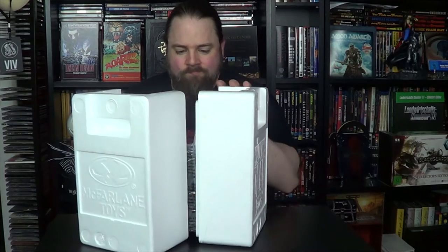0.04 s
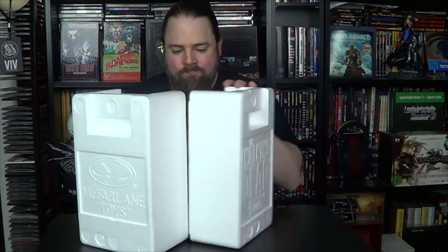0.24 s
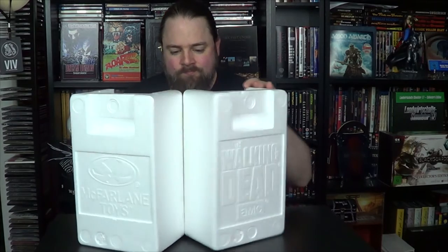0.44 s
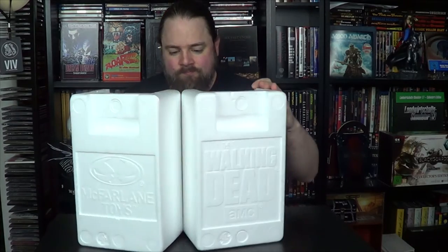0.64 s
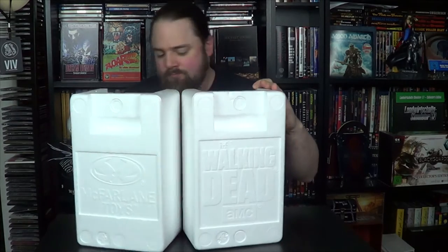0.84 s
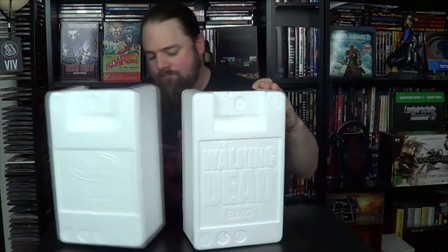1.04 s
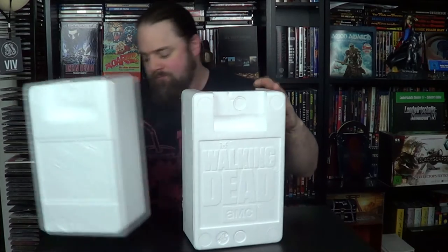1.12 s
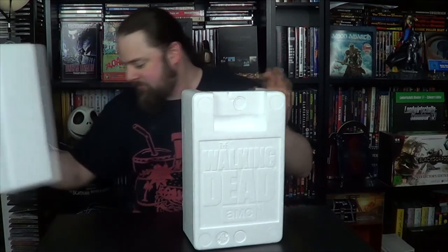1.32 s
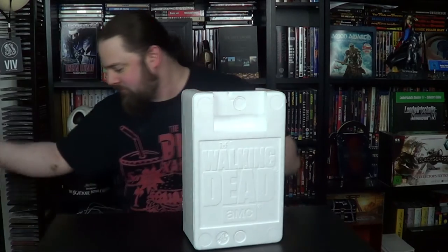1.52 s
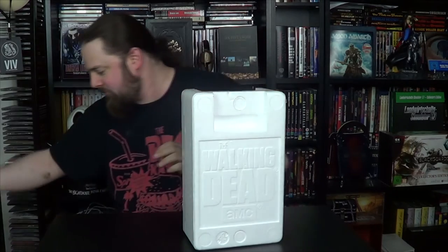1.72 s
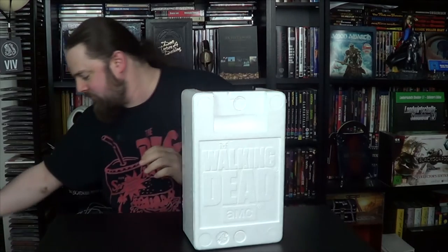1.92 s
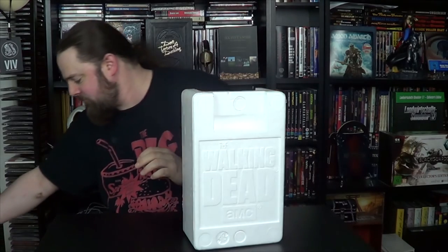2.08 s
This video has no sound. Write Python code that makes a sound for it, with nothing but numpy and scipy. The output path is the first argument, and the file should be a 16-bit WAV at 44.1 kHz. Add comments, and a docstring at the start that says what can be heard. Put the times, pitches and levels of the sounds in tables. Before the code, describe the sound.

Dry foam packing scrapes and squeaks as it is pulled apart, followed by soft hollow knocks

```python
"""Two halves of a foam case rub as they are swung open and pulled apart on a table in a small, shelf-lined room.
Random clicks make the rising hiss and rasp; a rough pulse train makes one short squeak; struck modes make snaps.
Then one hollow half is lifted, bumped and set aside: short bursts of clicks ring its shell, with dull table
thumps and soft brushing. Filtered noise makes the quiet room and a thin hiss; a sine makes a faint high whine."""
import sys
import numpy as np
from scipy import signal
from scipy.fft import rfft, irfft
from scipy.io import wavfile

SR = 44100
rng = np.random.default_rng(int(sys.argv[2]) if len(sys.argv) > 2 else 0)


def unload_wav(signal):
    """Save mono or channel-first audio to the path in sys.argv[1] as 16-bit WAV at rate SR, clipped to [-1, 1]."""
    wavfile.write(
        sys.argv[1],
        SR,
        np.round(np.clip(np.atleast_2d(signal).T, -1, 1) * 32767).astype(np.int16),
    )


N = 94815
T = np.arange(N) / SR  # time in seconds

# The faces rubbing: t/s, bead hiss level/dB, shell rasp level/dB
RUBBING = [(0, -63, -58), (.01, -55, -54), (.04, -47, -46.5), (.066, -42.5, -48), (.09, -60, -50),
           (.112, -62, -52.5), (0.128, -42.5, -44), (.21, -40, -41), (.27, -34.5, -40.5),
           (.355, -30.5, -40), (.41, -31, -40), (.48, -27, -37.5), (.525, -42, -40.5), (.562, -46, -41),
           (.59, -34.5, -42), (0.639, -35, -41.5), (.714, -52.5, -49.5), (.76, -43, -45.5),
           (.8, -62, -50.5), (.84, -59, -54), (.87, -66, -58.5), (.93, -56, -53), (.97, -85, -68),
           (1.08, -89, -63)]
# Spectrum of the bead hiss: f/Hz, relative level per Hz/dB
HISS_COLOUR = [(2000, -47), (4400, -17.5), (5200, -4.5), (6300, -3), (7300, -5), (8000, -1), (9700, 3),
               (11500, -3.5), (12600, -9.5), (16000, -13.5)]
# Spectrum of the shell's rasp: f/Hz, relative level per Hz/dB
RASP_COLOUR = [(50, -48), (100, -26), (165, -24), (190, -8.5), (225, -14), (270, -2), (295, -10.5),
               (340, -5), (430, -1), (550, -2), (680, -5), (1000, 1.5), (1400, -3), (2250, 2), (2900, -3.5),
               (3700, 1), (4600, -9.5), (9000, -49)]
SLIPS_PER_S, SLIP_SPREAD_DB = 18000, 2
JUDDER_DB, JUDDER_HZ = 0.5, 90  # unsteadiness of the slip sizes, and its highest rate

# Stick-slip squeak: t/s, slip rate f/Hz, level/dB
SQUEAK = [(.484, 1340, -61), (0.4856, 1330, -29), (0.488, 1364, -20.5), (.493, 1310, -21),
          (0.495, 1333, -15), (0.506, 1273, -18), (0.51, 1270, -24), (0.519, 1284, -28), (.53, 1265, -44),
          (.56, 1304, -60)]
# Spectrum of the squeak: f/Hz, relative level per Hz/dB
SQUEAK_COLOUR = [(1000, -44), (1700, -21), (2550, -13.5), (4200, -24.5), (5200, -13.5), (6500, -9),
                 (7600, -9.5), (8900, -1), (10300, -5.5), (11800, -5), (13000, -9), (16000, -20)]
SQUEAK_JITTER, JITTER_HZ = 0.018, 680  # spread of the slip rate as a share, and its highest rate
SQUEAK_GRIT = 1  # noise against pulses
SCATTER_S = 0.011  # phase delay of the fundamental, less for higher harmonics
# The shell singing under the squeak: f/Hz, level/dB, time to fall 60 dB/s
SING_MODES = [(2420, 0.5, 0.032), (2531, 0.5, 0.12), (5260, -3, .03), (6360, -6, 0.039)]
SING_DB = -16.5

# Beads snapping free: t/s, level/dB before the low cut
SNAPS = [(.0125, -51), (.0212, -47), (.4498, -28), (.772, -49), (.7877, -27)]
# What a snap rings with: f/Hz, level/dB, time to fall 60 dB/s
SNAP_MODES = [(1840, -14, 0.0023), (6200, -13, 0.01), (8360, -2.5, 0.0043), (9900, -2.5, 0.0018),
              (11200, -4.5, 0.0013), (15100, -9.5, 0.0017)]
SNAP_LOW_HZ = 3000  # a single bead radiates little below this

# Knocks and scuffs on the hollow foam: t/s, rise/s, fall/s, hollow ring level/dB, touched wall f/Hz,
# wall level/dB, crunch level/dB, bright crackle level/dB (all but the crackle before the low cut)
KNOCKS = [(.007, 0.0005, 0.014, -65, 1540, -46, -45, -74),
          (0.0204, 0.00053, 0.0069, -51, 1530, -40.5, -41, -49.5),
          (.115, 0.0035, 0.0066, -65, 303, -59, -65, -68), (.274, .004, 0.025, -38, 249, -51, -38, -54),
          (.319, 0.0041, 0.013, -37, 588, -38.5, -42, -60),
          (.358, 0.0019, 0.013, -57, 915, -55, -35.5, -39),
          (.549, 0.0024, 0.0058, -54, 546, -47, -44.5, -66),
          (0.748, 0.00409, 0.0069, -45.5, 229, -52, -44, -46),
          (0.857, .005, 0.022, -44, 407, -45.5, -46, -44.5),
          (0.988, 0.0011, 0.0047, -64, 438, -59, -62.5, -68.5),
          (1.1041, 0.00079, 0.0049, -44.5, 416, -42.5, -43, -47.5),
          (1.1184, 0.00026, 0.0024, -50, 417, -41.5, -37.5, -37.5),
          (1.127, 0.0017, 0.015, -48, 190, -53.5, -39.5, -47.5),
          (1.156, 0.00097, 0.011, -45, 560, -48, -54, -63), (1.176, 0.00096, .005, -54, 514, -50, -56, -53),
          (1.197, 0.0017, 0.0066, -68, 493, -47, -61, -70),
          (1.214, 0.00194, 0.0034, -59, 495, -47, -69, -77),
          (1.2595, 0.00065, 0.0047, -45.5, 1645, -47.5, -58, -54),
          (1.277, 0.00067, 0.0061, -65, 1120, -48.5, -59, -62),
          (1.487, .005, 0.023, -59, 940, -77, -56, -55.5),
          (1.542, 0.0032, 0.01, -48.5, 944, -44.5, -43, -42),
          (1.563, 0.00223, 0.0035, -47.5, 590, -53, -53, -56),
          (1.628, 0.0055, 0.014, -69, 483, -55.5, -77, -54.5),
          (1.738, 0.0021, 0.0049, -71, 503, -60.5, -66, -64),
          (2.012, 0.013, 0.011, -64, 1050, -63, -55, -61), (2.037, .002, 0.012, -50, 504, -47.5, -69, -61),
          (2.055, 0.0033, 0.0028, -51.5, 526, -63, -54, -61)]
# Hollow shell: f/Hz, level/dB, time to fall 60 dB/s
SHELL_MODES = [(330, -1, 0.099), (458, 3, 0.029), (517, 6.5, 0.058), (717, 3.5, 0.026), (903, 1.5, 0.073),
               (1080, -1.5, 0.065), (1406, -10, 0.12), (1620, -32.5, 0.02)]
# Spectrum of the crushed beads: f/Hz, relative level per Hz/dB
CRUNCH_COLOUR = [(50, -40), (150, -16), (400, -9), (900, 6), (1600, 7), (2400, 0.5), (3600, -0.5),
                 (4700, -15), (9000, -23)]
WALL_CYCLES = 28  # cycles the touched wall takes to fall 60 dB
CRUSH_SHARE = 0.7  # crushing against the impact
SHELL_LOW_HZ = 170  # the light shell radiates little below this

# Foam bumping the table: t/s, level/dB before softening
THUMPS = [(.057, -56.5), (.322, -52), (.84, -58), (1.119, -74)]
# The table: f/Hz, level/dB, time to fall 60 dB/s
TABLE_MODES = [(75.5, -5, 0.081), (110, -2, 0.036), (204, 1, 0.076)]
THUMP_SOFT_HZ = 259

# Light brushing as the half is set aside: middle t/s, half length/s, peak level/dB
BRUSHES = [(1.39, 0.088, -62.5), (1.639, 0.054, -54), (2.047, 0.02, -50)]
# Spectrum of the brushing: f/Hz, relative level per Hz/dB
BRUSH_COLOUR = [(150, -25), (500, 8), (2300, 5.5), (4600, -6), (6500, 0), (10500, -4.5), (14000, -13)]

# Position of the handled foam: t/s, left minus right level/dB
PAN = [(.5, 0), (1.15, .5), (1.5, 2.2), (2.05, 1.6)]
# Room decay: f/Hz, time to fall 60 dB/s
ROOM_T60 = [(200, 0.4), (550, 0.2), (1400, 0.22), (4000, 0.2), (10000, 0.36), (16000, 0.07)]
# Width of the reflections: f/Hz, side against middle level/dB
ROOM_SIDE = [(80, -16), (250, -19.5), (550, -17.5), (1200, -7), (2200, -12), (5000, -2), (7500, -4),
             (9500, -20), (15000, -64)]
# Width of the reflections of the squeak and snaps: f/Hz, side against middle level/dB
SHARP_SIDE = [(1000, -3), (5500, -6), (10000, -11.5), (15000, -16)]
# Reflections against direct sound, in dB
BODY_ROOM_DB, TREBLE_ROOM_DB, SQUEAK_ROOM_DB, SNAP_ROOM_DB = -5, -9, -8, -10.5
ROOM_GAP_S = 0.004023
EARLY_DB, EARLY_FALL_S = -1, 0.0071  # reflections off table and shelves: strength over the tail, and decay

# Faint thin hiss, drifting upward: t/s, centre f/Hz, level/dB
THIN_HISS = [(1.5, 10400, -85), (1.57, 10400, -59.5), (1.779, 10600, -72), (1.9, 11150, -67.5),
             (2.15, 11300, -69)]
THIN_HISS_WIDTH_HZ = 410  # to either side of the centre
# Room noise shared by both ears: f/Hz, relative level per Hz/dB
FLOOR_COLOUR = [(25, -16), (60, -11.5), (130, -7.5), (250, 1.5), (500, 1), (800, 1), (2500, 0),
                (4500, -3.5), (10800, -6), (13000, -9), (16000, -21)]
# Room noise differing between the ears: f/Hz, relative level per Hz/dB
FLOOR_SIDE_COLOUR = [(25, -24), (100, -21), (200, -13), (450, -2), (1000, -0.5), (2500, -6), (5000, -9.5),
                     (8000, -11), (10000, -26), (16000, -62)]
FLOOR_DB, FLOOR_SIDE_DB = -58.5, -60.5
WHINE_HZ, WHINE_DB = 15625, -69
CUTOFF_HZ = 15750


def rubbing():
    """The faces slide: the same slips hiss directly and rasp through the shell."""
    s, hiss_db, rasp_db = np.transpose(RUBBING)
    friction = slips()
    hiss = friction * from_db(np.interp(T, s, hiss_db, right=-120))
    rasp = friction * from_db(np.interp(T, s, rasp_db, right=-120))
    return colour(hiss, HISS_COLOUR), colour(rasp, RASP_COLOUR)


def slips():
    """Tiny slips of bead on bead: random clicks, scattered evenly, of uneven, slightly unsteady size; rms one."""
    size_db = SLIP_SPREAD_DB * np.minimum(rng.exponential(1, N), 5)
    sizes = from_db(size_db + JUDDER_DB * wander(JUDDER_HZ))
    signs = rng.choice([-1, 1], N)
    happens = rng.random(N) < SLIPS_PER_S / SR
    return unit(sizes * signs * happens) * np.sqrt(N)


def squeak():
    """The slips lock into a rough, slightly falling pulse train, smeared by the foam, that makes the shell sing."""
    s, hz, db = np.transpose(SQUEAK)
    rate = np.interp(T, s, hz) * (1 + SQUEAK_JITTER * wander(JITTER_HZ))
    phase = 2 * np.pi * np.cumsum(rate) / SR
    # bending waves: the higher a harmonic, the sooner it arrives
    scatter = 2 * np.pi * hz.mean() * SCATTER_S
    pulses = sum(np.cos(k * (phase - scatter / np.sqrt(k))) for k in range(1, 13))
    rough = pulses / pulses.std() + SQUEAK_GRIT * rng.standard_normal(N)
    level = from_db(np.interp(T, s, db, left=-120, right=-120))
    drive = rough / np.hypot(1, SQUEAK_GRIT) * level
    return colour(drive, SQUEAK_COLOUR) + from_db(SING_DB) * through(drive, ringing(SING_MODES))


def snaps():
    """Single caught beads let go with a thin, bright tick of short ringing modes."""
    low_cut = signal.butter(1, SNAP_LOW_HZ, "high", fs=SR, output="sos")
    return signal.sosfilt(low_cut, strikes(SNAPS, SNAP_MODES))


def knocks():
    """Each contact is an impact and a short crush of beads; returns the crackle and the shell's sound."""
    hollow, crunch, crackle = 0, 0, 0
    shell = ringing(SHELL_MODES)
    for s, rise, fall, ring_db, wall_hz, wall_db, crunch_db, crackle_db in KNOCKS:
        crush = unit(slips() * burst(s, rise, fall))
        push = CRUSH_SHARE * crush
        push[int((s + rise) * SR)] += 1  # the impact
        wall = ringing([(wall_hz, 0, WALL_CYCLES / wall_hz)])
        hollow = hollow + blow(ring_db) * unit(through(push, shell))
        hollow = hollow + blow(wall_db) * unit(through(push, wall))
        crunch = crunch + blow(crunch_db) * crush
        crackle = crackle + blow(crackle_db) * crush
    low_cut = signal.butter(2, SHELL_LOW_HZ, "high", fs=SR, output="sos")
    body = signal.sosfilt(low_cut, hollow + colour(crunch, CRUNCH_COLOUR))
    return colour(crackle, HISS_COLOUR), body


def burst(start, rise, fall):
    """Contact force over time: a straight rise, then an exponential fall."""
    attack = np.clip((T - start) / rise, 0, 1)
    return attack * np.exp(-np.maximum(T - start - rise, 0) / fall)


def thumps():
    """Soft, dull bumps: the table's modes are struck and their treble softened."""
    soften = signal.butter(2, THUMP_SOFT_HZ, fs=SR, output="sos")
    return signal.sosfilt(soften, strikes(THUMPS, TABLE_MODES))


def brushes():
    """Soft swells of friction slips as the foam is moved."""
    friction = slips()
    swell = sum(from_db(db) * np.exp(-0.5 * ((T - s) / half) ** 2) for s, half, db in BRUSHES)
    return colour(friction * swell, BRUSH_COLOUR)


def room_tail():
    """Early reflections after a short gap, over a diffuse tail of noise bands that each decay at their own speed."""
    t = T[:SR // 2]
    edges = np.geomspace(40, 18000, 10)
    tail = 0
    for low, high in zip(edges, edges[1:]):
        band_pass = signal.butter(2, [low, high], "band", fs=SR, output="sos")
        band = signal.sosfilt(band_pass, rng.standard_normal(len(t)))
        tail = tail + band * from_db(-60 * t / at_hz(ROOM_T60, np.sqrt(low * high)))
    early = from_db(EARLY_DB) * np.exp(-t / EARLY_FALL_S)
    return unit(tail * (t > ROOM_GAP_S) * (1 + early))


def in_room(x, wet_db, width):
    """Direct sound in the middle and reflections around it, scaled to hold the overall level."""
    wet = from_db(wet_db)
    side = through(through(x, room_tail()), response(width))
    middle = through(x, room_tail())
    reflections = middle + side * np.array([[1], [-1]])
    return (x + wet * reflections) / np.sqrt(1 + wet ** 2)


def thin_hiss():
    """A narrow band of faint high hiss: slow noise carried on a gliding tone."""
    s, hz, db = np.transpose(THIN_HISS)
    phase = 2 * np.pi * np.cumsum(np.interp(T, s, hz)) / SR
    level = from_db(np.interp(T, s, db, left=-120))
    band = wander(THIN_HISS_WIDTH_HZ) * np.cos(phase) + wander(THIN_HISS_WIDTH_HZ) * np.sin(phase)
    return level * band


def background():
    """Quiet room noise, partly different in each ear, and a thin electrical whine made by a sine."""
    mid = from_db(FLOOR_DB) * colour(rng.standard_normal(N), FLOOR_COLOUR)
    side = from_db(FLOOR_SIDE_DB) * colour(rng.standard_normal(N), FLOOR_SIDE_COLOUR)
    whine = from_db(WHINE_DB) * np.sqrt(2) * np.sin(2 * np.pi * WHINE_HZ * T)
    return mid + side * np.array([[1], [-1]]) + whine


def from_db(db):
    """Decibels to gain."""
    return 10 ** (np.asarray(db) / 20)


def unit(x):
    """Scale to an energy of one."""
    return x / np.sqrt(np.sum(x ** 2) + 1e-20)


def blow(db):
    """Gain that gives an event of energy one this level over ten milliseconds."""
    return from_db(db) * np.sqrt(SR / 100)


def wander(hz):
    """Smooth random motion of spread one: noise with everything well above hz removed."""
    smooth = signal.butter(2, hz, fs=SR, output="sos")
    slow = signal.sosfilt(smooth, rng.standard_normal(N + SR))[SR:]  # skip the filter's start
    return slow / slow.std()


def at_hz(points, hz):
    """Read a table on a log-frequency axis."""
    f, value = np.transpose(points)
    return np.interp(np.log(np.maximum(hz, 1)), np.log(f), value)


def through(x, impulse_response):
    """Play a signal through an impulse response."""
    return signal.fftconvolve(x, impulse_response)[:N]


def response(points, size=4096):
    """Impulse response with the given spectrum, and no sound before its start (minimum phase)."""
    hz = np.arange(size // 2 + 1) * SR / size
    cepstrum = irfft(np.log(from_db(at_hz(points, hz))))
    # fold the second half onto the first
    cepstrum[1:size // 2] *= 2
    cepstrum[size // 2 + 1:] = 0
    return irfft(np.exp(rfft(cepstrum)))


def colour(x, points):
    """Give a signal a spectrum; white noise keeps its level."""
    return through(x, unit(response(points)))


def ringing(modes):
    """Impulse response of decaying modes with alternating signs, energy one."""
    t = T[:SR // 2]
    total = 0
    for k, (hz, db, t60) in enumerate(modes):
        mode = unit(np.cos(2 * np.pi * hz * t) * from_db(-60 * t / t60))
        total = total + (-1) ** k * from_db(db) * mode
    return unit(total)


def strikes(rows, modes):
    """Clean blows at the given times and levels into a set of modes."""
    clicks = np.zeros(N)
    for s, db in rows:
        clicks[int(s * SR)] += blow(db)
    return through(clicks, ringing(modes))


def scene():
    """Surface and hollow body sounds share one room and lean left with the carried half, over the background."""
    hiss, rasp = rubbing()
    crackle, hollow = knocks()
    foam = in_room(rasp + hollow + thumps() + brushes(), BODY_ROOM_DB, ROOM_SIDE)
    foam = foam + in_room(hiss + crackle, TREBLE_ROOM_DB, ROOM_SIDE)
    foam = foam + in_room(squeak(), SQUEAK_ROOM_DB, SHARP_SIDE)
    foam = foam + in_room(snaps(), SNAP_ROOM_DB, SHARP_SIDE)
    left_minus_right_db = np.interp(T, *np.transpose(PAN))
    pan = from_db(left_minus_right_db * np.array([[0.5], [-0.5]]))
    return foam * pan + background() + thin_hiss()


def record(dry):
    """The top is cut steeply."""
    top_cut = signal.ellip(12, 0.1, 80, CUTOFF_HZ, fs=SR, output="sos")
    return signal.sosfilt(top_cut, dry)


dry = scene()
out = record(dry)
unload_wav(out)
```